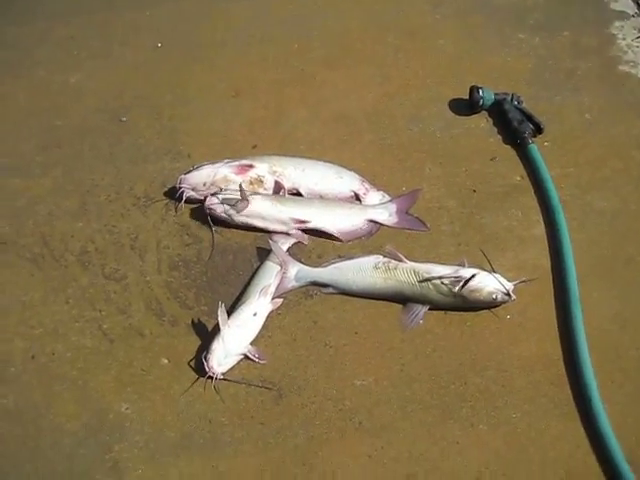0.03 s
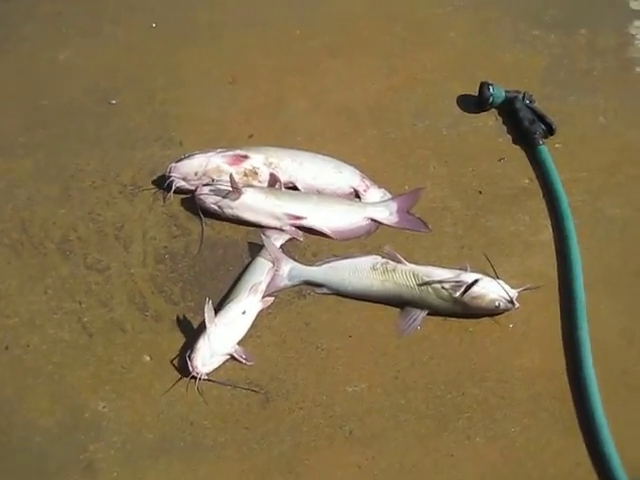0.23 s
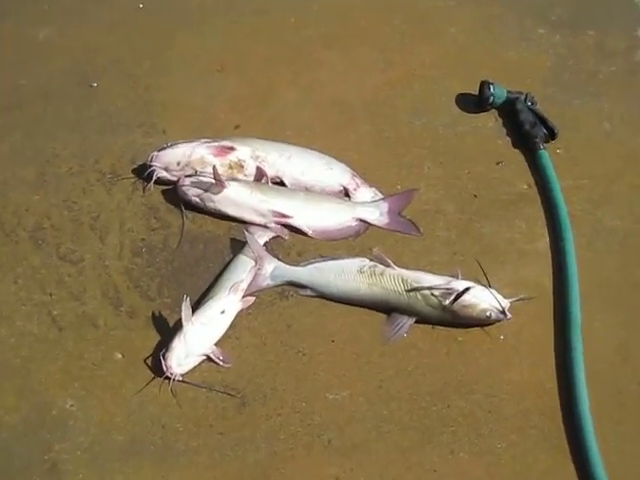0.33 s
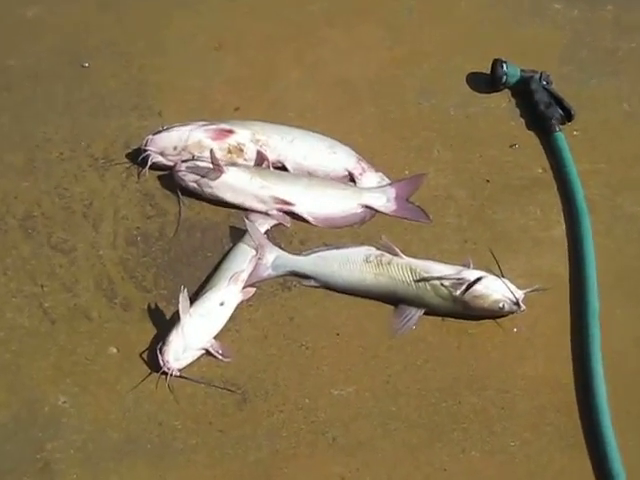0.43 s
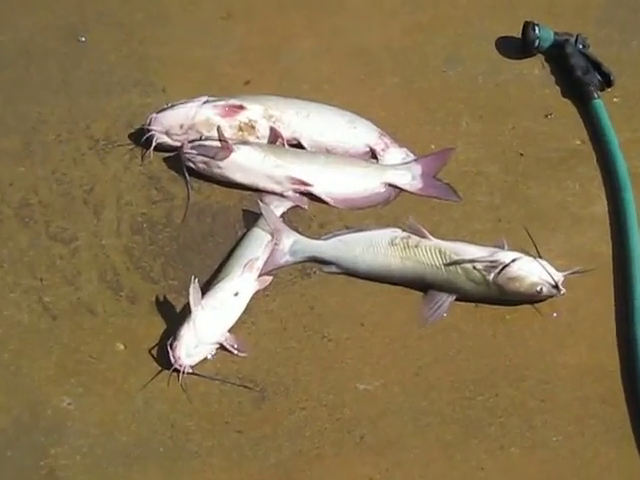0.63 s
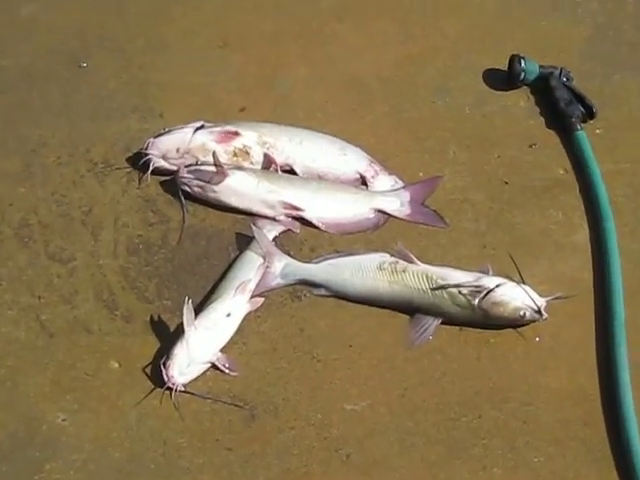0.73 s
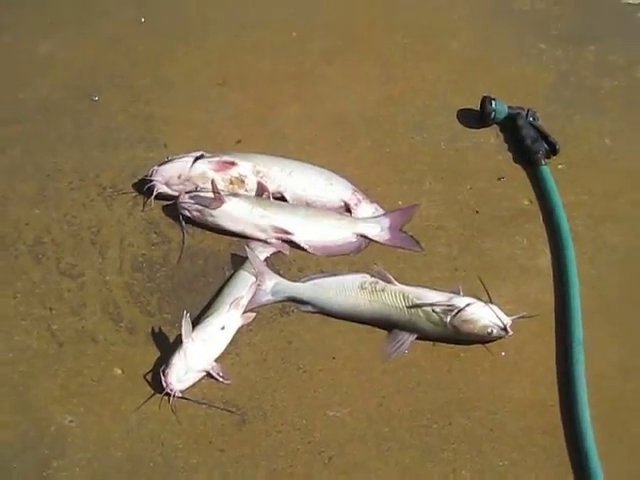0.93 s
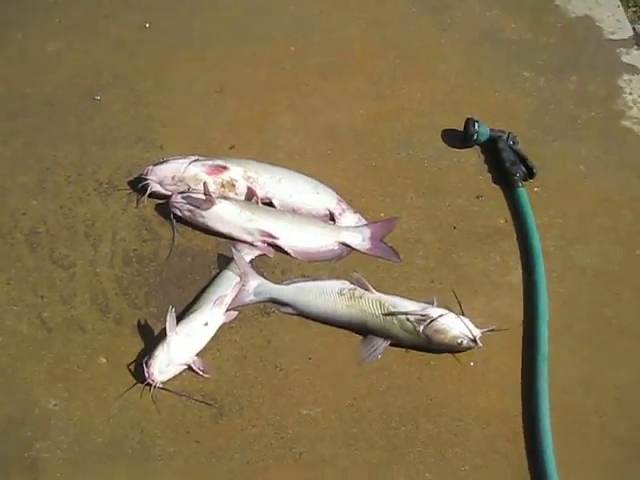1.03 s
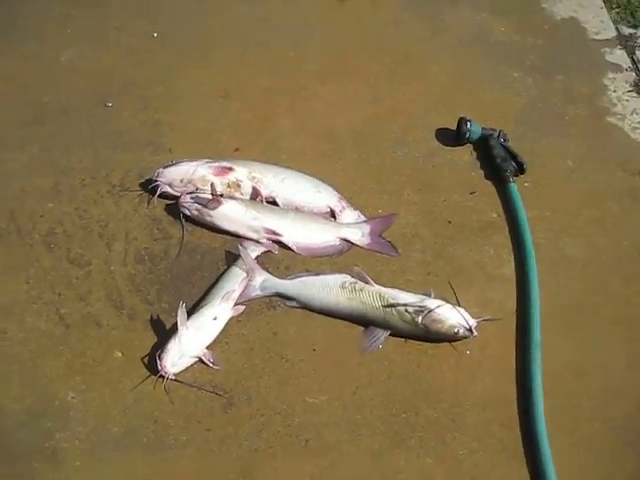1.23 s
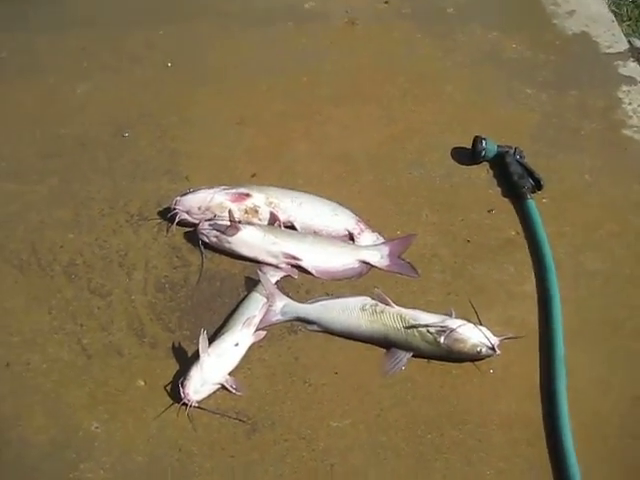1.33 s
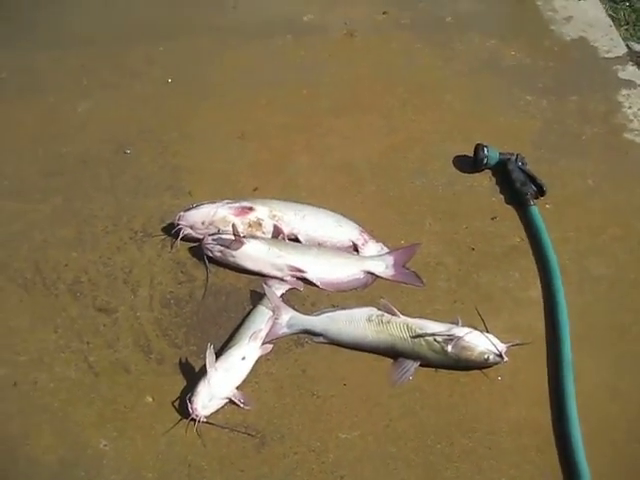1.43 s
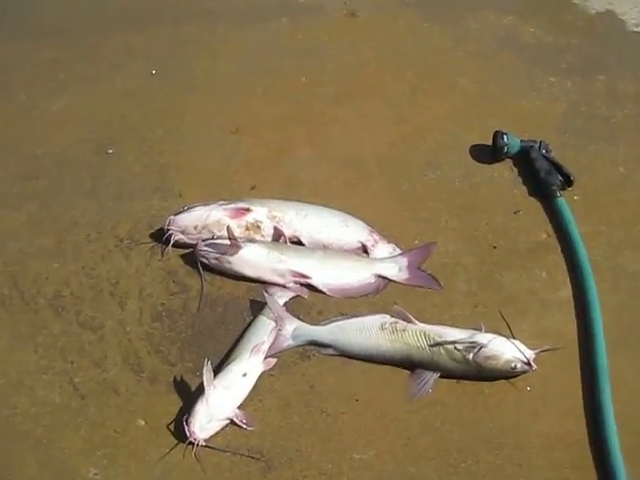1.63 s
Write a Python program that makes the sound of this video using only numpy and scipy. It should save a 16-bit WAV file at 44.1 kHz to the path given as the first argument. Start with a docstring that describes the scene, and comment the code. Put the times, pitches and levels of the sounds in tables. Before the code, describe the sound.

Close handling noise from a plastic camera body: a cluster of sharp clicks, lighter ticks and rubs, a rasp with a brief ping, then one more loud click, over quiet outdoor air with a faint wavering whine.

```python
"""Outdoors above some landed catfish: handling noise close to the microphone of a hand-held camera.
The plastic case creaks: it rubs, sticks and lets go in sharp clicks that overload the input;
one rasp sets a small metal part ringing. Behind it lie a soft outdoor hiss, a thin high sizzle
and faint wavering high whines, perhaps the lens motor. The whines carry an added digital
recording texture: a 43 Hz flutter with a small pitch dip."""
import sys
import numpy as np
from scipy import signal
from scipy.fft import rfft, irfft
from scipy.io import wavfile
from scipy.ndimage import uniform_filter1d

SR = 44100
rng = np.random.default_rng(int(sys.argv[2]) if len(sys.argv) > 2 else 0)


def transcribe(u):
    """Save the signal u as a 16-bit wav file named by the first command-line argument.

    u: samples, shape (n,) or (channels, n), limited to [-1, 1]; the rate is SR.
    q: integer samples, one column per channel.
    """
    v = np.clip(np.atleast_2d(u).T, -1, 1)
    q = np.round(v * 32767).astype(np.int16)
    wavfile.write(sys.argv[1], SR, q)


N = 74970
TIME_S, FREQ_HZ = np.arange(N) / SR, np.fft.rfftfreq(N, 1 / SR)

# modes of the plastic case: f/Hz, relative level/dB, t60/s
CASE_MODES = [(1300, -3, 0.021), (1700, -4.5, 0.012), (2060, 4.5, 0.012), (2270, -32, 0.0086),
              (3050, -24, 0.016), (3380, 10, 0.01), (3620, -1, 0.016), (3880, -22, 0.01)]
CASE_DELAY_S = 0.001055


def amp(db):
    """Decibels to gain."""
    return 10 ** (np.asarray(db) / 20)


def unit(x):
    """Scale to rms 1."""
    return x / np.sqrt(np.mean(x ** 2) + 1e-20)


def spectrum_db(points, hz=FREQ_HZ):
    """Interpolate a spectrum over log frequency."""
    f, db = np.transpose(points)
    return np.interp(np.log(hz + 1), np.log(f), db)


def add(mix, at_s, sound):
    """Mix a sound in, in place."""
    part = mix[round(at_s * SR):][:len(sound)]
    part += sound[:len(part)]


def colour(x, db):
    """Minimum-phase filter, one gain per FFT bin."""
    cepstrum = irfft(np.log(amp(db)), N)
    cepstrum[1:N // 2] *= 2
    cepstrum[N // 2 + 1:] = 0
    return irfft(rfft(x) * np.exp(rfft(cepstrum)), N)


def drift(samples):
    """Smoothed noise, rms 1."""
    return unit(uniform_filter1d(rng.standard_normal(N), size=samples))


def clicks(crack_s=0.00076):
    """The stuck shell lets go: a few cycles of flexing, a gritty crack, a push and a short ring."""
    # t/s, level/dB, f/Hz, swell/ms, crack trim/dB, push trim/dB, ring trim/dB
    releases = [(0.2399, -1.5, 2870, 0.52, -30, -59, -25), (0.2633, 5.5, 3384, .55, -27, -22, -27),
                (0.4676, -31, 1970, 0.33, -26, -28, -27), (0.4823, -31, 1700, 0.17, -25, -24, -24),
                (0.4857, -22, 1300, 0.35, -28, -28, -31), (0.5115, -16, 3220, 0.34, -22.5, -38, -20),
                (0.5576, -20.5, 3420, 1.3, 5.5, -35, -3.5), (0.6313, -4, 2820, 0.46, -41, -60, -21),
                (.2884, -8, 2980, 0.4, -2, -13.5, -21), (.2906, -9, 3380, 1.22, -36, -44, -25),
                (1.0244, -6.5, 1560, 0.37, -39, -47, -15), (1.0271, -12, 1686, 1.9, -4.5, -22, -25),
                (1.0286, -3.5, 3190, 0.49, -10, -14.5, -20), (1.0293, -6, 3510, 1.1, -28, -26, -36),
                (1.0398, -44.5, 5500, 0.26, 11, -30, -27), (1.4279, 2, 2880, 0.56, -13.5, -45, -18),
                (1.465, -37, 6700, .32, -5, -31, -23), (1.5827, -33.5, 3460, 0.47, -18, -34, -24),
                (1.637, -45, 3330, 0.9, -20, -34, -23)]
    # crack filter: f/Hz, gain/dB
    crack_filter = [(100, -37), (900, -15), (1300, -6), (1550, -2), (2300, 9), (3750, 5), (4300, -6),
                    (5800, 5), (6400, 4.5), (8500, -23), (10000, 2), (11500, -20.5), (13300, -2.5),
                    (16000, -15)]
    out, cracks, t = np.zeros(N), np.zeros(N), TIME_S[:SR // 20]
    for at_s, db, hz, swell_ms, crack_db, push_db, ring_db in releases:
        age = t / (swell_ms / 1000)
        flex = (age * np.exp(1 - age)) ** 2.58 * np.sin(2 * np.pi * hz * t)
        add(out, at_s, amp(db) * (flex - amp(push_db) * push(t)))
        add(out, at_s + CASE_DELAY_S, amp(db + ring_db) * ring(CASE_MODES, t))
        grit = rng.standard_normal(len(t)) * np.exp(-t / crack_s)
        crack = (t == 0) + grit / np.linalg.norm(grit)
        add(cracks, at_s + 0.0002, 5 * amp(db + crack_db) * crack)
    return out + colour(cracks, spectrum_db(crack_filter))


def push(t, peak_s=0.00014):
    """One short, low pressure pulse."""
    return t / peak_s * np.exp(1 - t / peak_s)


def ring(modes, t, rise_s=0.00045):
    """Damped modes with a soft onset."""
    onset = 1 - np.exp(-(t / rise_s) ** 2)
    return onset * sum(amp(db - 60 * t / t60) * np.sin(2 * np.pi * hz * t) for hz, db, t60 in modes)


def rasps(ring_db=-13):
    """Hard slips swell within milliseconds, break off and leave the case ringing."""
    # peak t/s, build/s, release/s, level/dB, push trim/dB
    slips = [(0.2898, 0.0065, 0.0019, -9.5, -39), (1.0293, 0.0054, 0.0011, -9.5, -10.5)]
    # hard friction spectrum: f/Hz, relative level/dB
    spectrum = [(60, -28), (400, -17.5), (900, -8.5), (1700, -0.5), (2600, -2.5), (3400, -11),
                (4400, -10.5), (7000, -16), (8600, -15.5), (10000, -8.5), (12000, -22), (16000, -23)]
    out, t = np.zeros(N), TIME_S[:SR // 20]
    for at_s, build_s, release_s, db, push_db in slips:
        out += amp(db) * stroke(at_s, build_s, release_s) * friction(spectrum_db(spectrum))
        add(out, at_s, -amp(db + push_db) * push(t))
        add(out, at_s + CASE_DELAY_S, amp(db + ring_db) * ring(CASE_MODES, t))
    return out


def rubs():
    """Soft friction through the resonances of the case."""
    # peak t/s, build/s, release/s, level/dB, treble shelf/dB
    strokes = [(0.151, 0.061, 0.019, -45.5, 3), (0.231, 0.034, .035, -38, 5),
               (0.272, 0.023, 0.035, -36.5, -14), (0.584, 0.0018, 0.004, -32.5, -2),
               (0.6, 0.026, 0.026, -37, 3), (0.627, 0.03, 0.018, -39, 0), (1.013, 0.0029, 0.017, -30.5, -5),
               (1.0236, 0.0092, 0.0047, -22, 15), (1.189, 0.022, 0.024, -44, -20),
               (1.232, 0.052, 0.022, -46, -5), (1.316, 0.027, 0.047, -48.5, 4),
               (1.371, 0.0063, 0.013, -40.5, 8), (1.406, 0.021, 0.0082, -39, -9),
               (1.415, 0.0073, 0.024, -27, 4)]
    # soft friction spectrum: f/Hz, relative level/dB
    spectrum = [(100, -18.5), (700, -17.5), (1300, -9), (1600, -8), (2050, -2.5), (2700, -4.5), (3200, 1.5),
                (3570, 2.5), (4150, -13.5), (6500, -18), (8800, -28.5), (9700, -13.5), (11500, -24.5),
                (16000, -22.5)]
    out, shelf = np.zeros(N), 1 - 1 / (1 + (FREQ_HZ / 5500) ** 4)
    for at_s, build_s, release_s, db, treble_db in strokes:
        shape_db = spectrum_db(spectrum) + treble_db * shelf
        out += amp(db) * stroke(at_s, build_s, release_s) * friction(shape_db)
    return out


def friction(shape_db, slips_per_s=5700, spread_db=2):
    """Dense tiny slips of uneven size, levelled and filtered; rms 1."""
    size = amp(spread_db * np.minimum(rng.exponential(1, N), 3))
    slips = size * rng.choice([-1, 1], N) * (rng.random(N) < slips_per_s / SR)
    local_rms = np.sqrt(abs(uniform_filter1d(slips ** 2, size=220)) + 1e-3)
    return unit(colour(slips / local_rms, shape_db))


def stroke(peak_s, build_s, release_s, drop_db=15.5):
    """Envelope: pressure builds to a peak, then lets go."""
    away = np.where(TIME_S < peak_s, (peak_s - TIME_S) / build_s, (TIME_S - peak_s) / release_s)
    return amp(-drop_db * away ** 1.26)


def ping(at_s=1.029):
    """A small metal part rings on after the second rasp."""
    # metal modes: f/Hz
    modes_hz = [3065, 3685]
    # their decays: level/dB, t60/s
    decays = [(-27.5, .2), (-46, 0.36)]
    modes = [(hz, db, t60) for hz, (db, t60) in zip(modes_hz, decays)]
    out = np.zeros(N)
    add(out, at_s, ring(modes, TIME_S))
    return out


def whines(flutter_hz=43, flutter_depth=0.5, flutter_dip_hz=202, fade_s=0.01):
    """Faint wavering high whines, perhaps the lens motor; flutter and dip are added digital texture."""
    # start/s, end/s, f/Hz, level/dB, rms waver/Hz
    tones = [(0, 0.303, 8430, -65.5, 89), (0.108, 0.284, 8430, -62.5, 80), (0.332, 0.493, 5830, -65, 170),
             (0.658, .84, 5880, -63, 168), (.68, 1.16, 8410, -71, 100), (.86, 1.015, 7380, -67, 110),
             (1.092, 1.347, 5890, -66.5, 190), (1.157, 1.344, 8420, -61.5, 80),
             (1.47, 1.65, 5890, -65, 190)]
    out, cycle = np.zeros(N), flutter_hz * TIME_S % 1
    flutter = 1 - flutter_depth * np.cos(2 * np.pi * cycle)
    for start_s, end_s, hz, db, waver_hz in tones:
        pitch_hz = hz + waver_hz * drift(90) + flutter_dip_hz * (0.5 - cycle)
        tone = np.sqrt(2) * np.sin(2 * np.pi * np.cumsum(pitch_hz) / SR)
        gate = np.clip(np.minimum(TIME_S - start_s, end_s - TIME_S) / fade_s, 0, 1)
        out += amp(db) * tone * gate * flutter
    return out


def sizzle(centre_hz=14600, width_hz=1400, pulses_per_s=105):
    """Thin high noise in fast, slightly uneven pulses, perhaps an insect."""
    # envelope: t/s, level/dB
    levels = [(0, -76), (.55, -77), (.7, -67), (1.4, -66), (1.5, -57.5), (1.7, -67)]
    passband = np.exp(-((FREQ_HZ - centre_hz) / width_hz) ** 2)
    band = irfft(rfft(rng.standard_normal(N)) * passband, N)
    rate_hz = pulses_per_s * (1 + 0.15 * drift(900))
    pulses = np.sin(np.pi * np.cumsum(rate_hz) / SR) ** 4
    return amp(np.interp(TIME_S, *np.transpose(levels))) * unit(band * pulses)


def air(level_db=-51, patch_db=1.5):
    """Steady outdoor hiss with slight drifting patches."""
    # hiss spectrum: f/Hz, relative level/dB
    spectrum = [(20, -93.5), (100, -83.5), (300, -85.5), (800, -83), (1200, -83.5), (1700, -89.5),
                (2500, -91), (3300, -91), (4500, -96), (7000, -99), (10000, -99), (12500, -103),
                (15000, -99)]
    hz, _, bins = signal.stft(rng.standard_normal(N), SR, nperseg=1024)
    patches = uniform_filter1d(rng.standard_normal(bins.shape), size=12, axis=0)
    patches = unit(uniform_filter1d(patches, size=12, axis=1))
    bins *= amp(spectrum_db(spectrum, hz)[:, None] + patch_db * patches)
    return amp(level_db) * unit(signal.istft(bins, SR)[1][:N])


def scene():
    """All sources at one microphone."""
    return (clicks() + rubs() + rasps() + ping() + whines() + air() + sizzle())[None]


def record(dry):
    """Treble notch, overload, gain control that dips after loud hits, band limit."""
    notch_hz, notch_width_hz, ceiling, cutoff_hz = 7874, 390, 0.9, 16000
    threshold_db, duck_share, recover_db_per_s, smooth_s = -18.5, 0.63, 185, 0.0028
    notch = 1 - 0.85 * np.exp(-((FREQ_HZ - notch_hz) / notch_width_hz) ** 4)
    x = irfft(rfft(dry[0]) * notch, N)
    x = x / (1 + (x / ceiling) ** 6) ** (1 / 6)
    pole = np.exp(-1 / (smooth_s * SR))
    power_db = 10 * np.log10(signal.lfilter([1 - pole], [1, -pole], x ** 2) + 1e-12)
    ramp_db = TIME_S * recover_db_per_s
    held_db = np.maximum.accumulate(power_db + ramp_db) - ramp_db  # decaying peak hold
    over_db = np.maximum(held_db - threshold_db, 0)
    x = x * amp(-duck_share * signal.lfilter([1 - pole], [1, -pole], over_db))
    lowpass = signal.firwin(255, cutoff_hz, window=("kaiser", 8), fs=SR)
    return signal.oaconvolve(x, lowpass, "same")[None]


dry = scene()
out = record(dry)
transcribe(out)
```